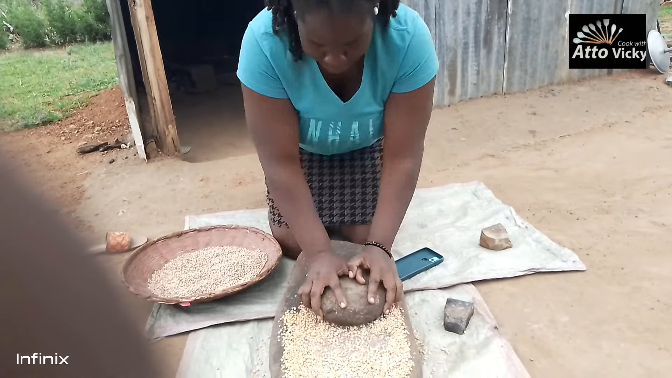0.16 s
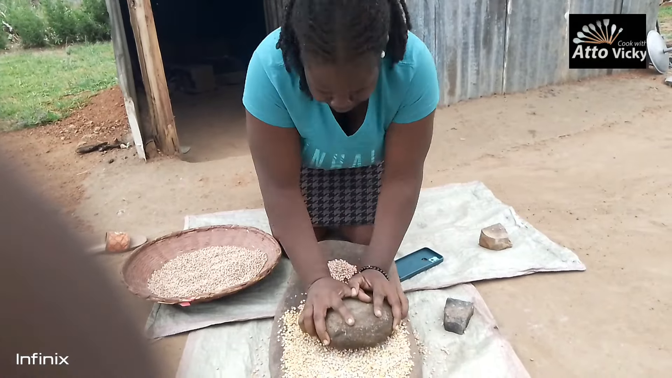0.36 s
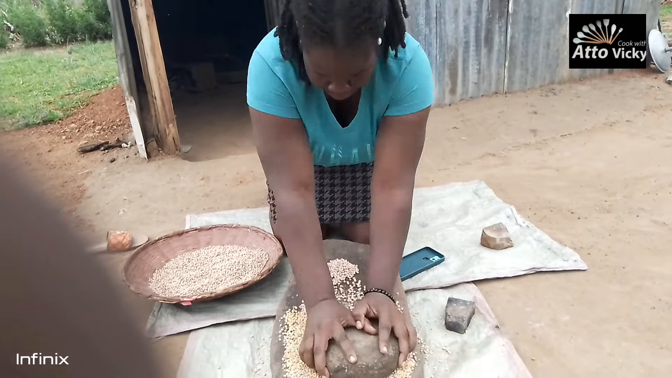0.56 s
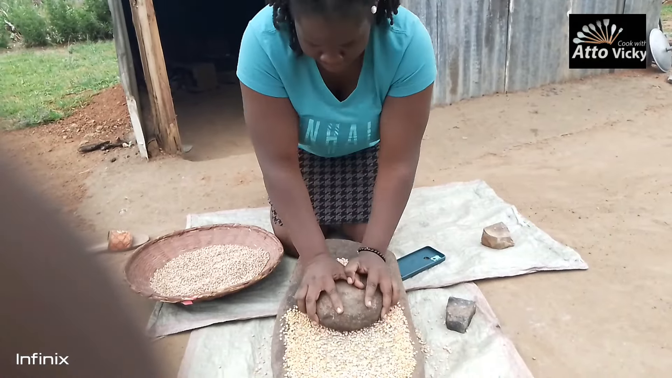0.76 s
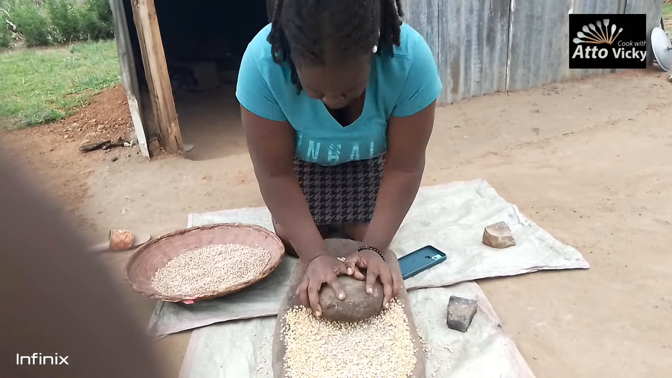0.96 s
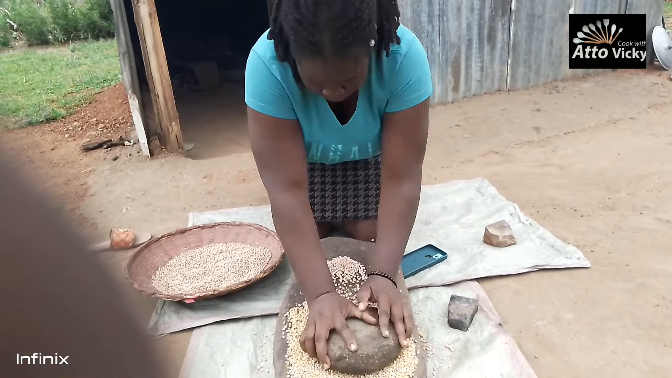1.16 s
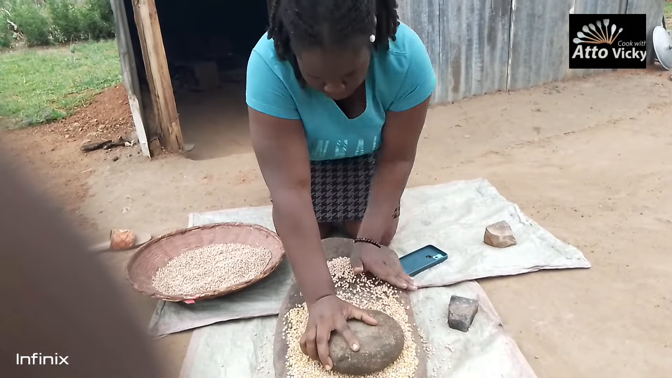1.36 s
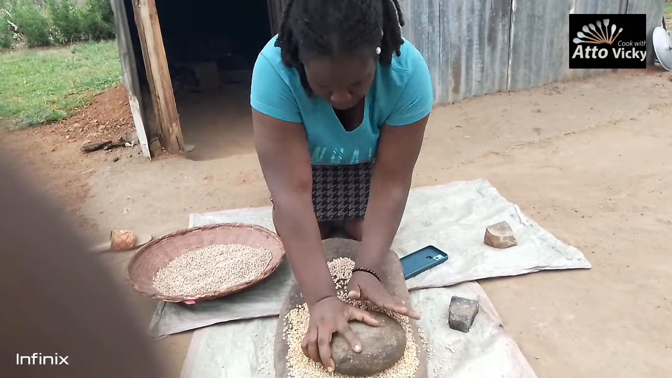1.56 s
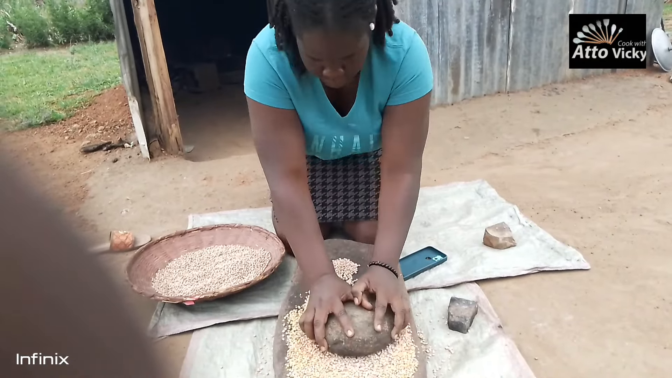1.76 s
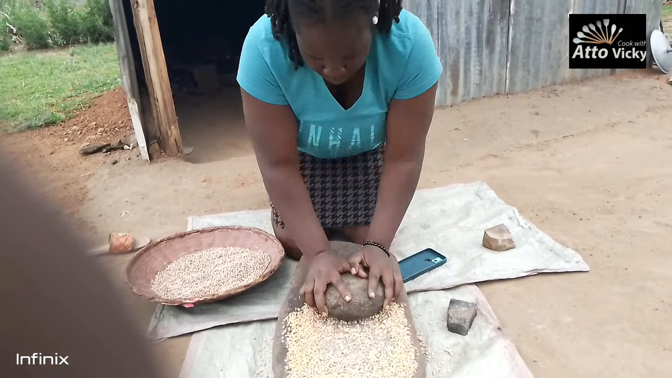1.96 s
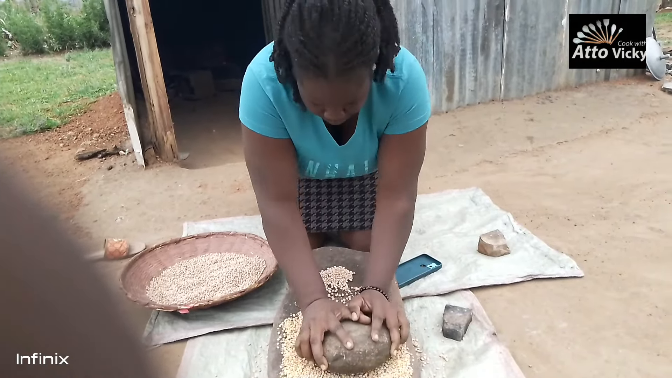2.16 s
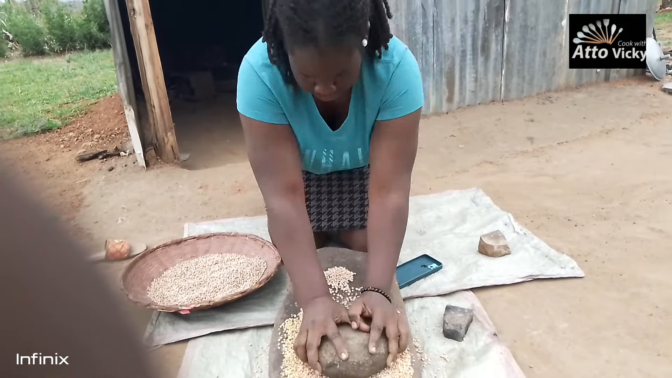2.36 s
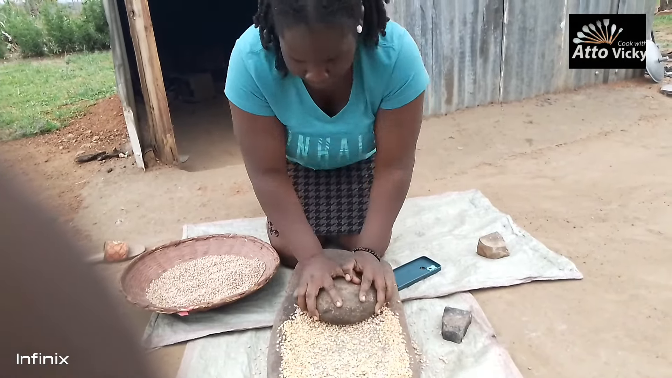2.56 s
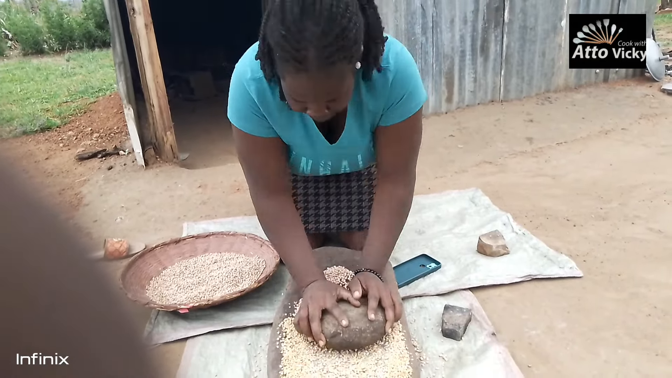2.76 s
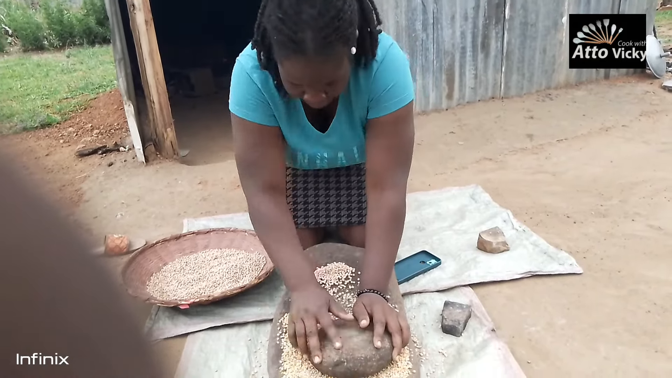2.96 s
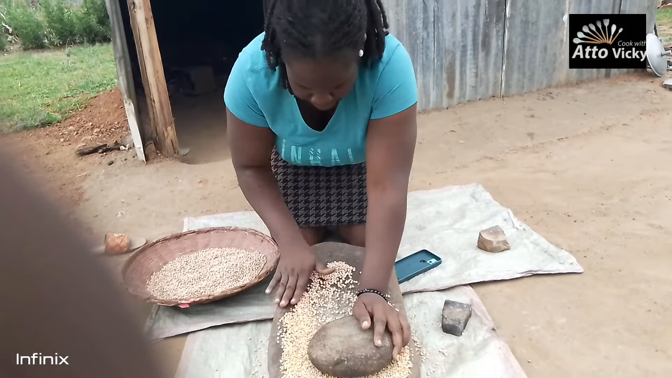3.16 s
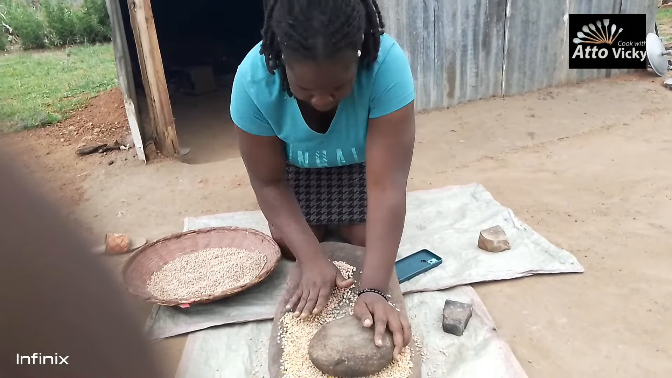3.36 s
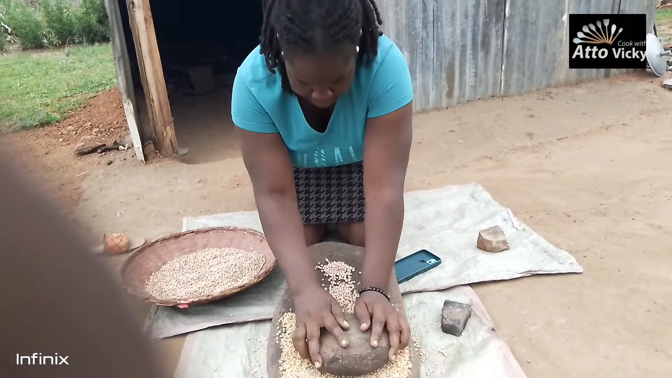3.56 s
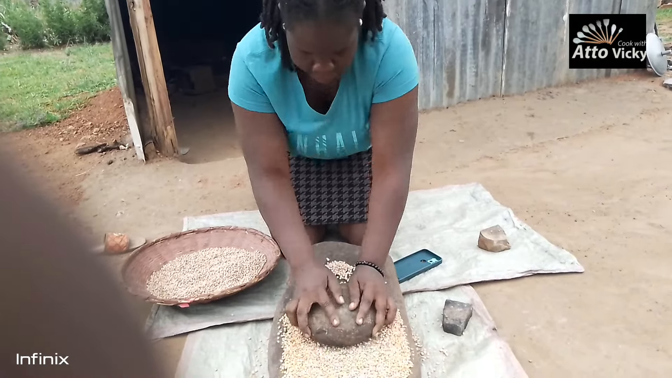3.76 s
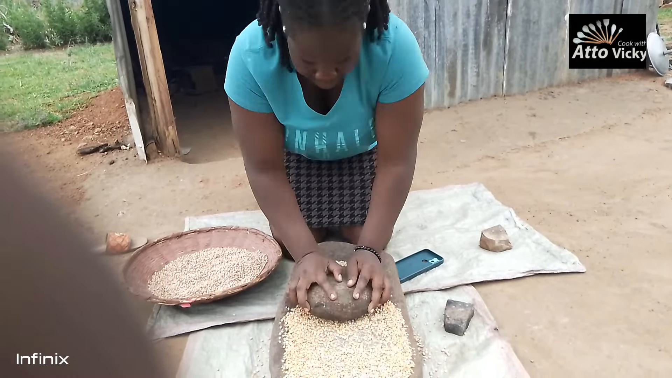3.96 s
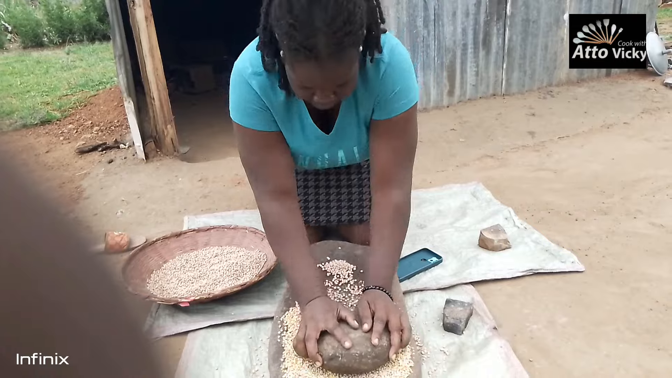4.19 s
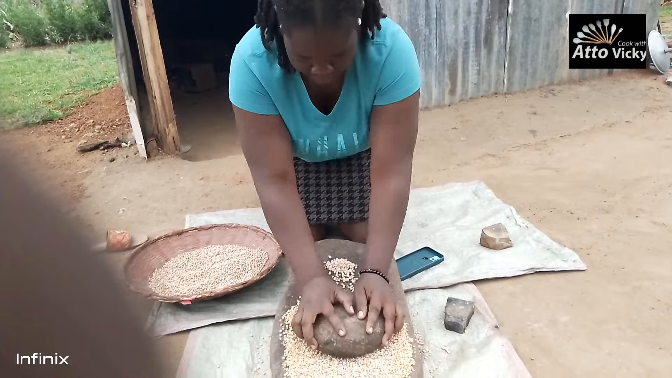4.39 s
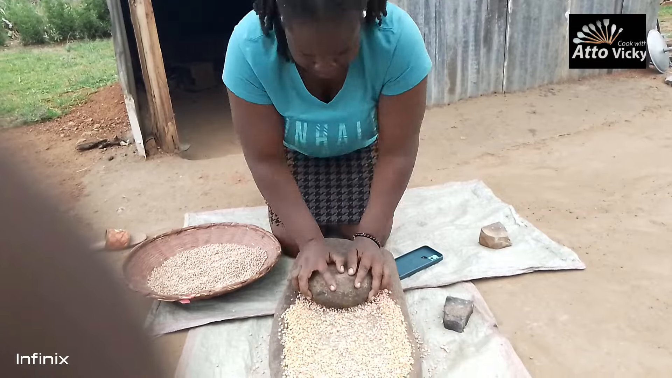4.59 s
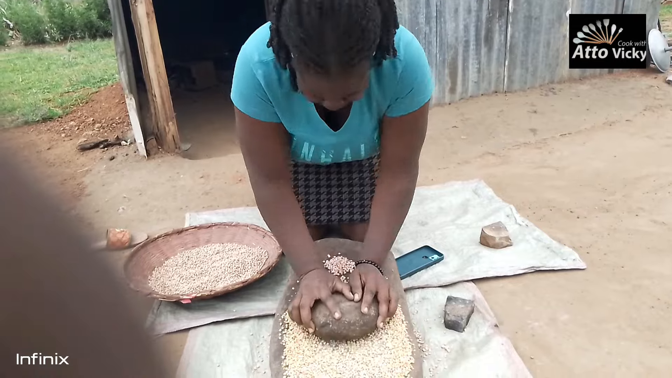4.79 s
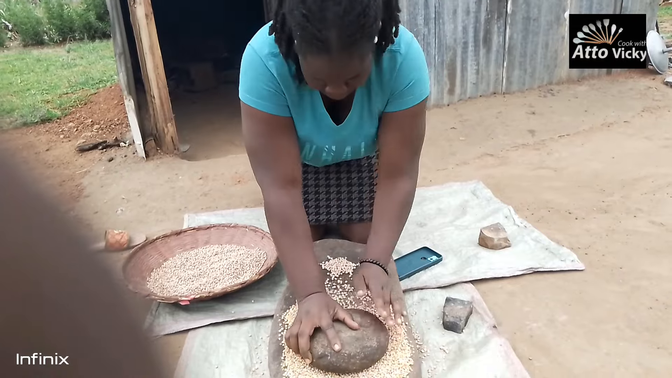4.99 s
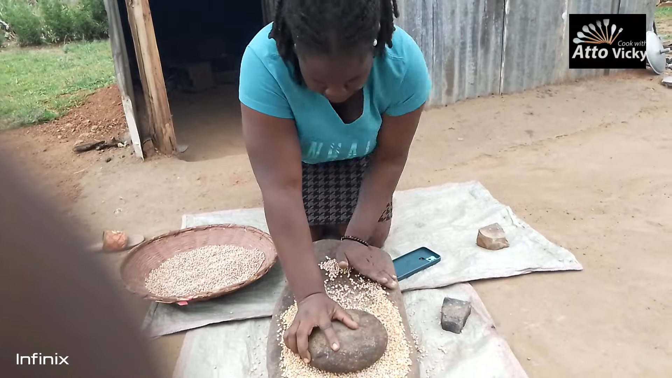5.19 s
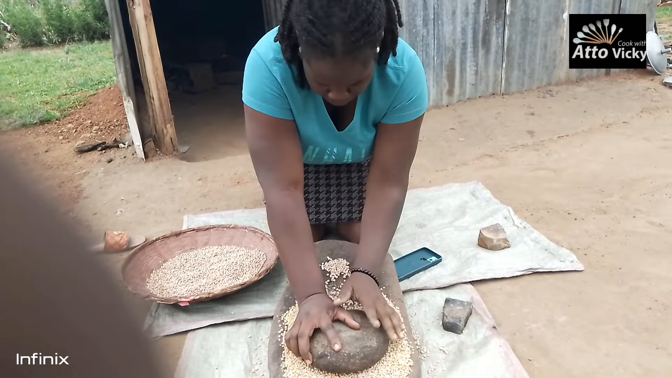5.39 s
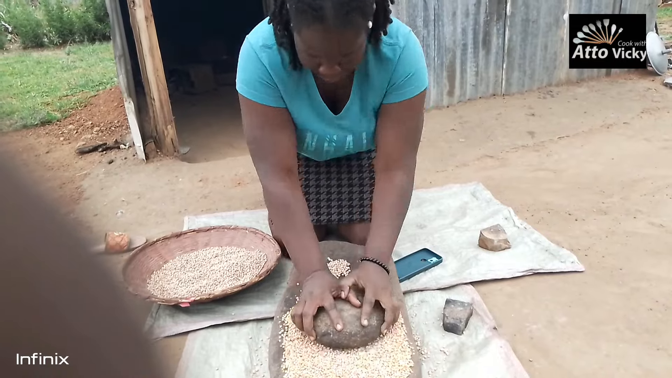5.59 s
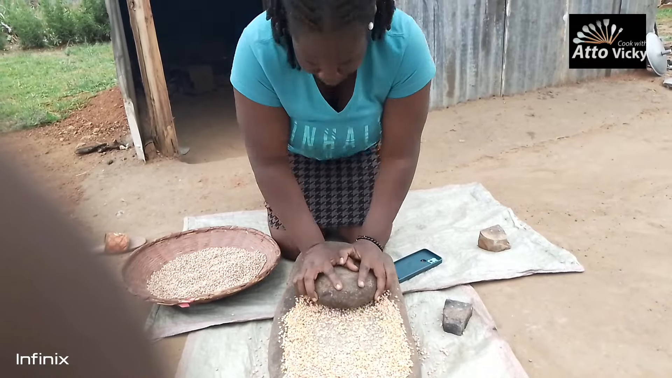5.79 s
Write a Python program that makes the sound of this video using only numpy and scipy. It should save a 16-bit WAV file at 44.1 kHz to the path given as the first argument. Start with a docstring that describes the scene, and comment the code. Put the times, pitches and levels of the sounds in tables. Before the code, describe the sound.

Very close to the microphone, a hand stone is shoved over dry peas on a flat stone. Each heavy push is a bright, crackling crunch with loud snaps and a dull stony ring; quieter rolling drags come between. Strokes come in pairs, separated by short lulls with a soft sweep of loose peas. The open yard is quiet and dry, with faint insect hiss and a low wind flutter midway.

```python
"""Hand stone over dry peas

A hand stone is pushed and dragged over dry peas on a flat stone in an open yard, close to the microphone.
Clumped noise impacts are the crackling grit; they drive resonances, the dull ring of the stones.
Short noise bursts are splitting peas; soft grit swells are a hand sweeping loose peas back.
Filtered noise gives far air, hissing insects and gusts; gliding sines give a faint bird."""
import sys
import numpy as np
from scipy import signal
from scipy.io import wavfile
from scipy.ndimage import uniform_filter1d

SR = 44100
rng = np.random.default_rng(int(sys.argv[2]) if len(sys.argv) > 2 else 0)


def invert_db(level):
    """Linear amplitude ratio for a level in decibels (20 dB per decade), elementwise."""
    return 10 ** (np.asarray(level, dtype=float) / 20)


def output_pcm(signal):
    """Save a mono or channel-first signal as 16-bit PCM at the path in sys.argv[1].

    Samples are clipped to [-1, 1] before scaling.
    """
    pcm = np.clip(np.atleast_2d(signal).T, -1, 1) * 32767
    wavfile.write(sys.argv[1], SR, np.round(pcm).astype(np.int16))


N = 257544  # samples

# resonances of the hand stone, low then upper ring: (f/Hz, width/Hz, level/dB)
HAND_STONE_MODES = [(913, 110, 3), (1154, 110, -2.5)]
# resonances of the flat stone under weight: (f/Hz, width/Hz, level/dB)
FLAT_STONE_MODES = [(104, 37, -35), (270, 76, -6), (445.4, 230, -5), (1303, 310, -6.5), (1669, 480, -4.5),
                    (1880, 200, -2.5), (2227, 320, -6), (2634, 820, -8), (3383, 390, -16.5),
                    (4240, 170, -15.5), (5350, 240, 1), (5750, 330, -1.5)]


def evened(x):
    """Normalisation by mean power: scales to rms 1."""
    return x / np.sqrt(np.mean(x ** 2) + 1e-20)


def read(points, hz):
    """Spectral envelope: straight lines between points on a log-frequency axis."""
    f, value = np.transpose(points)
    return np.interp(np.log(hz + 1), np.log(f + 1), value)


def peaks(modes, hz):
    """Resonance: bells, each at half its peak gain half a width off centre, summed in power."""
    power = sum(invert_db(2 * db) / (1 + (2 * (hz - f) / width) ** 2) ** 2 for f, width, db in modes)
    return np.sqrt(power)


def colour(x, gain_at):
    """Minimum-phase filtering: the phase is the Hilbert transform of the log gain."""
    hz = abs(np.fft.fftfreq(8192, 1 / SR))
    log_gain = np.log(gain_at(hz) + 1e-5)
    response = np.exp(np.conj(signal.hilbert(log_gain)))
    taps = np.fft.ifft(response).real[:4096]
    return signal.oaconvolve(x, taps)[:N]


def slow(hz):
    """Low-pass random process: smooth chance of rms 1, changing about hz times a second."""
    lowpass = signal.butter(2, hz, fs=SR, output="sos")
    return evened(signal.sosfilt(lowpass, rng.standard_normal(N)))


def yard():
    """Stationary noise shaped by spectrum: open air, and narrow insect bands of wavering level."""
    # spectrum of the air before its level is set: (f/Hz, relative density/dB)
    air_spectrum = [(15, -41.5), (25, 10.5), (43, -9), (87, -3), (153, -7.5), (217, -4.5), (335, -6.5),
                    (575, -14.5), (818, -14.5), (1400, -25), (3820, -19.5), (5570, 7.5), (6920, -12),
                    (9070, -23.5), (16000, -10)]
    # insect bands: (f/Hz, width/Hz, mean level/dB)
    insect_bands = [(4585, 220, -78), (5430, 270, -73)]
    air = evened(colour(rng.standard_normal(N), lambda hz: invert_db(read(air_spectrum, hz))))
    out = air * invert_db(-64 + 0.62 * slow(3.4))
    for f, width, db in insect_bands:
        band = colour(rng.standard_normal(N), lambda hz: peaks([(f, width, 0)], hz))
        out += evened(band) * invert_db(db + 1.0 * slow(45))
    return out


def tent(s, rise_s, fall_s, drop_db):
    """Exponential growth and decay: dB climb straight to 0 at s, from drop_db a rise before, then fall."""
    t = np.arange(N) / SR - s
    return drop_db * np.maximum(-t / rise_s, t / fall_s)


def push_moves():
    """Loading by weight: each push swells and dies alike, ring and slab building as the peas flatten."""
    # heavy pushes away from the body; ring and slab levels are above the grit, before the changes below:
    # (start t/s, length/s, loudest grit level/dB, low ring level/dB, slab level/dB)
    push_table = [(0.382, 0.31, -23, -15, -12), (1.043, 0.28, -22.5, -12.5, -12),
                  (2.123, 0.32, -24, -14, -10.5), (2.789, 0.29, -25.5, -8.5, -9.5),
                  (4.107, 0.32, -24.5, -13, -11.5), (4.801, 0.3, -23.5, -16, -13)]
    # swell of every push: (share of its length, level/dB)
    push_shape = [(0, -23), (.05, -17), (.15, -5), (.36, 0), (.74, -8), (.9, -21), (1.0, -30.5),
                  (1.35, -61)]
    # changes at (start, middle, end), dB
    low_change, upper_change, slab_change = (-7, .1, -7.5), (-31, -20, -18), (-5, 0.2, -1)
    t, moves = np.arange(N) / SR, []
    share, shape_db = np.transpose(push_shape)
    for s, length, db, low_db, slab_db in push_table:
        u = (t - s) / length
        grit_db = db + np.interp(u, share, shape_db, -np.inf, -np.inf)
        low, upper, slab = (np.interp(u, (.1, .4, .95), c) for c in (low_change, upper_change, slab_change))
        moves.append((grit_db, [low + low_db, upper, slab + slab_db]))
    return moves


def drag_moves():
    """Sliding, then rolling contact: a drag slides on the upper ring, then rolls on the low one."""
    # light drags back; the ring level is above the grit, before the changes below:
    # (start t/s, rolling t/s, stop t/s, grit level setting off/dB, loudest rolling/dB, low ring level/dB)
    drag_table = [(0.052, 0.123, 0.4, -51.5, -43.5, -18.5), (0.691, .85, 1.016, -48.5, -31, -16.5),
                  (1.802, 1.954, 2.11, -52.5, -38.5, -12), (2.439, 2.588, 2.806, -50.5, -37.5, -13.5),
                  (3.754, 3.922, 4.088, -51.5, -35.5, -9), (4.406, 4.559, 4.788, -50.5, -35, -13.5),
                  (5.622, 5.728, 5.9, -52.5, -36, -20)]
    # changes at (sliding, rolling, stop), dB
    low_change, upper_change, slab_change = (-11, .1, -3.5), (-19, -27, -34), (-15.5, -19.5, -24)
    set_off_s, swell_s, stop_s = 0.04, 0.071, 0.066  # setting off, rolling to loudest, stopping
    edge_s, switch_s = 0.07, 0.034  # fade beyond both ends, half the change from slide to roll
    slide_db_per_s, sag_db, rest_db = 51, -5, -12.5  # swell in the slide, sag after loudest, fall at rest
    t, moves = np.arange(N) / SR, []
    for s, roll, stop, first_db, db, low_db in drag_table:
        slid_db = first_db + slide_db_per_s * (roll - s - set_off_s)
        end_db = db + sag_db + rest_db
        at = (s - edge_s, s, s + set_off_s, roll, roll + swell_s, stop - stop_s, stop, stop + edge_s)
        level = (first_db + 2 * rest_db, first_db + rest_db, first_db, slid_db,
                 db, db + sag_db, end_db, end_db + rest_db)
        grit_db = np.interp(t, at, level, -np.inf, -np.inf)
        phases = (roll - switch_s, roll + switch_s, stop)
        changes = (np.add(low_change, low_db), upper_change, slab_change)
        moves.append((grit_db, [np.interp(t, phases, c) for c in changes]))
    return moves


def sweep_moves():
    """Light contact: a hand sweeps loose peas back, so grit swells and the stones hardly sound."""
    # sweeps, 23.5 dB down a rise before or a fall after: (loudest t/s, grit level/dB, rise/s, fall/s)
    sweep_table = [(1.603, -55, 0.25, 0.29), (3.442, -52, 0.23, .18), (5.413, -51, 0.14, 0.13)]
    body_db = (-41.5, -59, -24)  # low ring, upper ring, slab above the grit
    return [(db + tent(s, rise_s, fall_s, -23.5), body_db) for s, db, rise_s, fall_s in sweep_table]


def strokes():
    """Incoherent addition: gains of grit, low ring, upper ring and slab, summed in power over movements."""
    moves = push_moves() + drag_moves() + sweep_moves()
    power = sum(np.array([invert_db(2 * (grit_db + above)) for above in (0, *body_db)]) for grit_db, body_db in moves)
    return np.sqrt(power)


def grains(per_s, spread_db, length_s, tail_db, clump_db, clump_hz):
    """Shot noise: clumped impacts of uneven size, each a noise burst with a weak scattered tail."""
    hit = rng.random(N) < per_s / SR
    size = invert_db(spread_db * np.minimum(rng.exponential(1, N), 4.5)) * hit
    t = np.arange(2500) / SR
    burst = np.exp(-t / length_s) + invert_db(tail_db) * np.exp(-t / 0.095)
    clumped = size * invert_db(clump_db * slow(clump_hz))
    power = signal.oaconvolve(clumped ** 2, burst ** 2)[:N]
    return evened(np.sqrt(abs(power)) * rng.standard_normal(N))


def grit_gain(hz):
    """Spectral colour of grit at the microphone: a broad slope and resonances, summed in power."""
    # broad slope: (f/Hz, level/dB)
    grit_slope = [(700, -49), (2500, -45.5), (4000, -21), (4900, -26.5), (6500, -11.5), (9500, -2.5),
                  (13000, -11.5), (15800, -8)]
    # resonances: (f/Hz, width/Hz, level/dB)
    grit_modes = [(5650, 2270, -13), (7350, 830, -8.5), (8900, 440, -1.5), (10370, 220, -19.5),
                  (12600, 310, -23.5), (14270, 1400, -7)]
    return np.hypot(invert_db(read(grit_slope, hz)), peaks(grit_modes, hz))


def shifting(x, depth_db):
    """Interference: echoes between stones, hands and ground give narrow, randomly drifting peaks and dips."""
    z = signal.stft(x, nperseg=512, noverlap=384)[2]
    field = uniform_filter1d(rng.standard_normal(z.shape), size=2, axis=0)
    for _ in range(2):  # smooth in time
        field = uniform_filter1d(field, size=40, axis=1)
    z = z * invert_db(depth_db * evened(field))
    return evened(signal.istft(z, nperseg=512, noverlap=384)[1][:N])


def grinding(grit, low, upper, weight):
    """Forced vibration: grit crackles under the stone, rings it and, under weight, shakes the slab."""
    crackle = grains(per_s=2800, spread_db=3.0, length_s=0.00083, tail_db=-21.5, clump_db=2.5, clump_hz=22.5)
    bumps = grains(per_s=810, spread_db=2.5, length_s=0.0011, tail_db=-22.5, clump_db=3.5, clump_hz=36.6)
    force = evened(bumps + crackle)  # the stones feel both the peas rolling and the grit
    flutter = force * invert_db(4.1 * slow(35))  # contact comes and goes as peas pass under
    rings = np.zeros(N)
    for mode, gain in zip(HAND_STONE_MODES, (low, upper)):
        ring = evened(colour(flutter, lambda hz: peaks([mode], hz)))
        rings += ring * invert_db(mode[2]) * gain
    slab = shifting(colour(force, lambda hz: peaks(FLAT_STONE_MODES, hz)), depth_db=3.0)
    coloured_grit = shifting(colour(crackle, grit_gain), depth_db=5.0)
    return grit * coloured_grit + rings + slab * weight


def snap(z, top_db, ms):
    """Impulsive fracture: a pea snaps in a millisecond or two and leaves a weak rattling tail; peak 1."""
    t = np.arange(len(z)) / SR
    onset = np.minimum(t / 0.00043, 1)
    burst = z * (np.exp(-1000 * t / ms) + 0.23 * np.exp(-t / 0.0034)) * onset

    def gain(hz):
        treble_db = (top_db + 4.5) / (1 + np.exp((12000 - hz) / 600))
        low_cut_db = 11 / (1 + (hz / 6500) ** 8)
        stones = invert_db(-26.5) * peaks(FLAT_STONE_MODES + HAND_STONE_MODES, hz)
        return grit_gain(hz) * invert_db(treble_db - low_cut_db) + stones

    burst = colour(burst, gain)[:len(t)]
    return burst / abs(burst).max()


def cracks(grit):
    """Sudden release of strain: loud splits at set moments, smaller ones at random where grit sounds."""
    # loud splits; the treble shelf above 12 kHz lifts 4.5 dB more than its setting:
    # (t/s, peak level/dB, treble setting/dB, decay/ms)
    crack_table = [(0.157, -23.5, -3, 1.1), (0.2229, -29, -7, 1.3), (0.2853, -24.5, -8.5, 1.3),
                   (0.394, -17, -7, 1.7), (0.4262, -9, -9, 2.3), (0.4665, -6, -8, 1),
                   (0.539, -7.5, -10, 0.93), (0.623, -13.5, 0, 1.3), (0.778, -25, -8, 1.3),
                   (0.845, -19, 1, 1.6), (0.882, -13.5, -3, 1.5), (0.9756, -15.5, -3.5, 2.8),
                   (1.053, -22.5, -14, 1.6), (1.1192, -8.5, -13, 1.3), (1.1488, -12, -9, 1.3),
                   (1.2085, -10, -2, 1.3), (1.3004, -28.5, -13, 1), (1.484, -55, -14, 1.1),
                   (2.126, -22.5, -4, 1.6), (2.1847, -11.5, -23, 1.3), (2.1986, -12.5, -11, 1.5),
                   (2.2535, -6.5, -9, 1.3), (2.6406, -19, -5, 1.5), (2.671, -18, -7, 1.6),
                   (2.7664, -34, -10, 1.3), (2.7932, -14.5, -8, 1.7), (2.8193, -8.5, -8, 1.2),
                   (2.831, -14, -10, 2), (2.8887, -4.5, -7.5, 1.3), (2.95, -13.5, -10, 1.3),
                   (3.909, -29, -6, 1.3), (3.9385, -24.5, -11, 1.4), (3.9772, -21.5, -3, 1.9),
                   (4.12, -24, -9, 1.1), (4.139, -14.5, -11, 1.3), (4.1806, -6.5, -8, 1.5),
                   (4.2634, -21.5, -8, 1.2), (4.3462, -15.5, -16, 1.1), (4.598, -13.5, -9, 1.3),
                   (4.7134, -20, -13, 1.5), (4.7944, -14, -11, 1.9), (4.812, -20, -8, 1.1),
                   (4.8292, -10.5, -16, 1.3), (4.8646, -12, -10, 1), (4.8844, -15, -1, 1.1),
                   (4.9604, -14, -4, 1.5), (5.2773, -41, -8, 1.3), (5.7838, -21.5, 0, 1.8)]
    out = np.zeros(N + 1500)
    above_db = 1 + 3.5 * np.minimum(rng.exponential(1, N), 4)  # peak of small splits above the grit gain
    size = grit * invert_db(above_db) * (rng.random(N) < 45 / SR)  # 45 draws a second
    kind = rng.integers(0, 12, N)
    for k in range(12):
        top_db, ms = rng.uniform(-17.5, 0.5), rng.uniform(0.55, 2.9)
        small = snap(rng.standard_normal(1500), top_db, ms)
        out[:N] += signal.oaconvolve(size * (kind == k), small)[:N]
    for s, db, top_db, ms in crack_table:
        out[round(s * SR):][:1500] += invert_db(db) * snap(rng.standard_normal(1500), top_db, ms)
    return out[:N]


def wind():
    """Turbulent pressure: lumpy low buffeting of air on the microphone port, and single thumping puffs."""
    # gusts, 22 dB down a rise before or a fall after:
    # (loudest t/s, rise/s, fall/s, upper level/dB, deep level/dB)
    gust_table = [(.57, .12, .12, -54, -63), (1.1, .3, .2, -79, -72), (2.754, .05, .03, -70, -61.5),
                  (2.95, .15, 0.13, -55, -71.5), (3.05, .07, 0.098, -39, -56.5),
                  (3.19, .08, 0.044, -48.5, -51), (3.292, .05, 0.025, -61.5, -58),
                  (3.5, .15, 0.094, -66.5, -60.5), (3.686, .1, 0.068, -69, -64),
                  (4.29, .06, 0.22, -53, -60.5), (4.42, .1, 0.13, -72, -63), (5.08, .06, 0.037, -58, -58),
                  (5.468, .03, 0.038, -82.5, -67.5)]
    # buffeting resonances, upper list then deep list, each scaled to rms 1: (f/Hz, width/Hz, level/dB)
    buffet_modes = [
        [(270, 180, 1.5), (473, 210, -10)],
        [(104.4, 90, -4.5)],
    ]
    # puffs: (t/s, level/dB of the sine before its bell envelope, f/Hz)
    puff_table = [(2.748, -43, 298), (3.014, -34.5, 300), (3.052, -35.5, 330), (3.086, -38, 280),
                  (3.165, -42, 270), (3.188, -34.5, 270), (3.288, -53.5, 234), (4.4, -51, 197),
                  (5.479, -56.5, 270)]
    t, out = np.arange(N) / SR, np.zeros(N)
    lumps = rng.standard_normal(N) * invert_db(3.5 * slow(27))
    upper, deep = (evened(colour(lumps, lambda hz: peaks(modes, hz))) for modes in buffet_modes)
    for s, rise_s, fall_s, db, deep_db in gust_table:
        out += invert_db(tent(s, rise_s, fall_s, -22)) * (invert_db(db) * upper + invert_db(deep_db) * deep)
    for s, db, hz in puff_table:
        bell = np.exp(-((t - s) * hz / 0.88) ** 2)
        out += invert_db(db) * bell * np.sin(2 * np.pi * hz * (t - s))
    return out


def bird():
    """Frequency modulation: faint whistles, sines whose phase sums a straight glide in frequency."""
    # notes: (start t/s, length/s, first f/Hz, last f/Hz, peak level/dB)
    note_table = [(1.36, 0.11, 2330, 1880, -80), (1.66, 0.15, 2030, 2510, -88)]
    out = np.zeros(N)
    for s, length, first_hz, last_hz, db in note_table:
        hz = np.linspace(first_hz, last_hz, round(length * SR))
        tone = np.sin(2 * np.pi * np.cumsum(hz) / SR) * signal.windows.tukey(len(hz), .4)
        out[round(s * SR):][:len(hz)] += invert_db(db) * tone
    return out


def scene():
    """Superposition: the yard, the stones and peas close by, the wind and the bird add linearly."""
    gains = strokes()
    return (yard() + grinding(*gains) + cracks(gains[0]) + wind() + bird())[None]


def band_limit(x):
    """A steep low-pass at the top of the band."""
    return signal.sosfilt(signal.butter(12, 16810, fs=SR, output="sos"), x)


def record(dry):
    """Filtering and band limits: fixed narrow spectral dips, the microphone's bass loss, a treble limit."""
    # fixed narrow dips in the spectrum of the whole sound: centre f/Hz
    dip_hz = [165, 1440, 3030, 3990, 4750]
    # the same narrow dips in order: (width/Hz, depth/dB)
    dip_shapes = [(39.5, 14.5), (88, 7), (114, 11), (108.5, 14.5), (149, 9.5)]

    def dips(hz):
        return invert_db(-sum(db / (1 + (2 * (hz - f) / width) ** 2) for f, (width, db) in zip(dip_hz, dip_shapes)))

    bass = signal.butter(3, 72, "high", fs=SR, output="sos")
    edge = signal.firwin(801, 15760, window=("kaiser", 7), fs=SR)
    x = signal.sosfilt(bass, colour(dry[0], dips))
    mix = signal.oaconvolve(x, edge, "same")[None]
    return band_limit(mix)


dry = scene()
out = record(dry)
output_pcm(out)
```